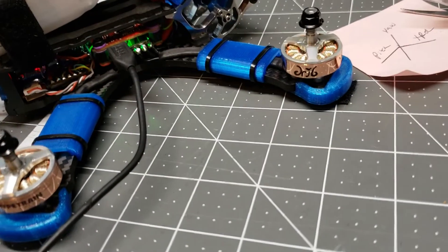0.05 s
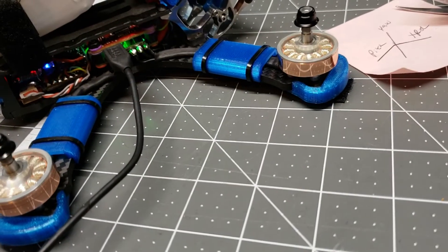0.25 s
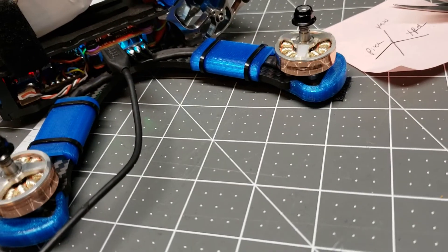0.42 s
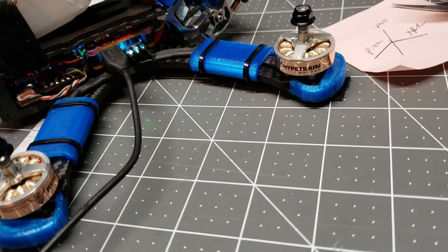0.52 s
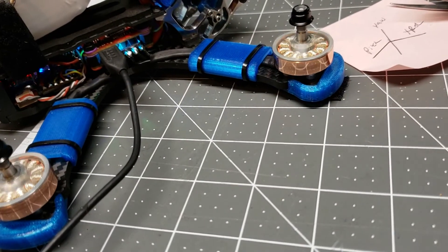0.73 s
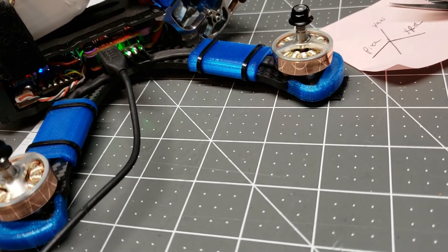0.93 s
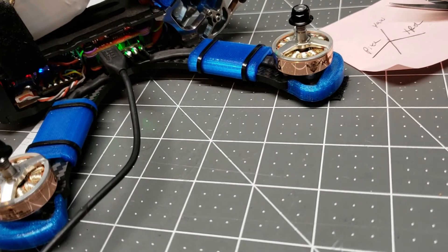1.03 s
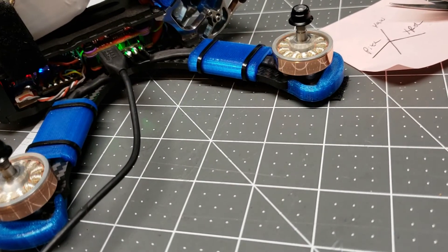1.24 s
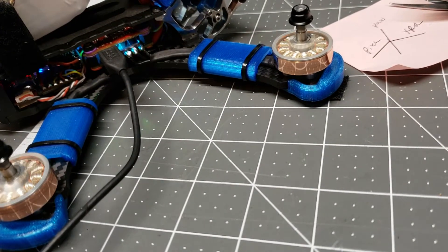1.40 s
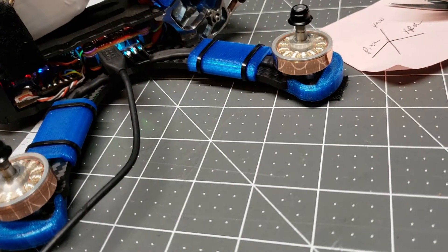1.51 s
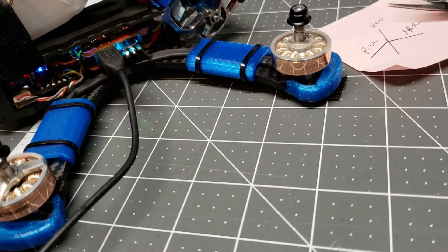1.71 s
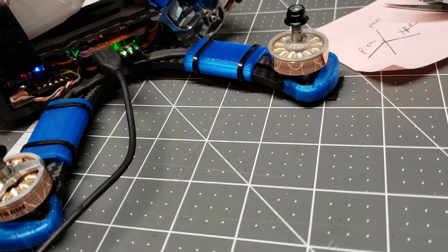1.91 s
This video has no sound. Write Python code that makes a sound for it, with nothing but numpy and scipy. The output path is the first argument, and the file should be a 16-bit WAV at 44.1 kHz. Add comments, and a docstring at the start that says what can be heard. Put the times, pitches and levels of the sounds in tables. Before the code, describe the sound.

Drone motors twitch three times with harsh metallic buzzing zips, then coast down with a faint whine.

```python
"""On a workbench in a hard room, small brushless drone motors twitch, spin up and brake three times near a phone.
Rough kicks of the drive current ring the metal bells, magnets whine on multiples of the shaft speed,
and the frame and an arm shake. After the last burst the rotors coast down, singing faintly.
A hiss swells before the first burst, the room rings on after each sound, and a low hum lies under it all."""
import sys
import numpy as np
from scipy import signal
from scipy.fft import rfft, irfft
from scipy.io import wavfile
from scipy.ndimage import uniform_filter1d, map_coordinates

SR = 44100
rng = np.random.default_rng(int(sys.argv[2]) if len(sys.argv) > 2 else 0)


def field_ratio(decibels):
    """Amplitude ratio for a level in dB (20 dB per decade); scalars and array-likes work."""
    return 10 ** (np.asarray(decibels, dtype=float) / 20)


def to_wav(s):
    """Save 16-bit WAV."""
    ch = np.atleast_2d(s).T  # columns
    pcm = np.round(np.clip(ch, -1, 1) * 32767)  # PCM
    wavfile.write(sys.argv[1], SR, pcm.astype(np.int16))


N = 85995  # length in samples


def unit(x):
    """Scale to rms 1."""
    return x / np.sqrt(np.mean(x ** 2, axis=-1, keepdims=True))


def on_log(hz, table):
    """Read a (f/Hz, value) table on a logarithmic frequency axis."""
    points = np.array(table, float)
    return np.interp(np.log(np.maximum(hz, 1)), np.log(points[:, 0]), points[:, 1])


def colour(x, table):
    """Make each frequency louder or softer, following a (f/Hz, level/dB) table."""
    gain = field_ratio(on_log(np.fft.rfftfreq(N, 1 / SR), table))
    return irfft(rfft(x) * gain, N)


def ring(x, hz, width):
    """Two-pole resonance 'width' Hz wide, with gain 1 at its centre."""
    return signal.lfilter(*signal.iirpeak(hz, hz / width, fs=SR), x)


def walk(rate):
    """Wandering random curve: 'rate' new values a second, each held and then smoothed twice."""
    hold = int(SR / rate)
    steps = np.repeat(rng.standard_normal(N // hold + 1), hold)
    return 1.22 * uniform_filter1d(uniform_filter1d(steps, hold), hold)[:N]


def read(tables, col, off):
    """One column of several tables drawn along time, with the value 'off' outside them."""
    t = np.arange(N) / SR
    out = np.full(N, float(off))
    for rows in tables:
        points = np.array(rows, float)
        on = (t >= points[0, 0]) & (t <= points[-1, 0])
        out[on] = np.interp(t[on], points[:, 0], points[:, col])
    return out


def later(x, seconds):
    """Delay, also by fractions of a sample."""
    return map_coordinates(x, [np.arange(N) - seconds * SR], order=3, mode="nearest")


def whine(shaft, orders, flutter_db):
    """Sines on multiples of the shaft speed, each wavering in pitch and level."""
    total = 0
    for multiple, db in orders:
        speed = shaft * (1 + .002 * walk(90))
        turns = np.cumsum(speed) / SR
        sine = np.sqrt(2) * np.sin(2 * np.pi * (multiple * turns + rng.random()))
        total = total + field_ratio(db + flutter_db * walk(59.56)) * sine
    return total


# how fast the shaft turns, one list for each burst: (t/s, f/Hz)
SHAFT_SPEED = [
    [(.22, 20), (.265, 40), (.285, 75), (.3, 90), (.32, 102), (.345, 112), (.36, 86), (.37, 72), (.4, 40)],
    [(.77, 22), (.82, 48), (.84, 75), (.855, 87), (.865, 95), (.876, 84), (.885, 74), (.915, 55)],
    [(1.25, 20), (1.3, 45), (1.33, 97), (1.35, 108), (1.38, 116.6), (1.42, 120.6), (1.46, 122.4),
     (1.5, 122.7), (1.567, 122.9), (1.59, 84), (1.605, 85), (1.63, 72)],
]


def shaft_speed():
    """The shaft spins up and is braked in each burst; 20 Hz stands in between bursts."""
    return read(SHAFT_SPEED, col=1, off=20)


# how hard the drive works, one list for each burst: (t/s, rasp level/dB, frame shake level/dB against the rasp,
# whine level/dB before motor() takes off 10, left over right level/dB)
EFFORT = [
    [(0.227, -21.5, -24.5, -2, 2.5), (0.241, -20.5, -22.5, 2, -4), (0.259, -39, -19, -1.5, 11.5),
     (0.273, -17.5, -24.5, -1, -3.0), (0.301, -17.5, -27, 0, 0), (0.333, -20, -31.5, -5, -1.5),
     (0.365, -19, -14.5, 0, -1), (0.4, -24, -20.5, -2, -2.5)],
    [(0.778, -40.5, -21, -7, -1.5), (0.792, -27, -27.5, -1, -3.5), (0.808, -45.5, -12.5, -1, -7),
     (0.822, -21, -37, 0, -1.5), (0.846, -17.5, -22, 2, 0), (0.862, -28, -11.5, 1, -4.0),
     (0.878, -18, -23.5, 0.5, -2), (0.915, -41.5, -10.5, 3, 8.5)],
    [(1.258, -54, -7.5, -1, 0.5), (1.268, -28.5, -23.5, -5, -6), (1.29, -46, -20.5, -1, 5),
     (1.304, -19.5, -29.5, 0.5, 2), (1.33, -23.5, -23.5, 7, -3), (1.338, -28, -12.5, 1, 3),
     (1.364, -30, -36, -7.5, 0.5), (1.472, -27, -36, -15, -1.5), (1.544, -28, -39.5, -6, 3.5),
     (1.592, -18, -18.5, 5.5, -2.5), (1.63, -64, -16.5, 2.5, -2.5)],
]
# colour of the motor's rasp and whine: (f/Hz, level/dB)
MOTOR_COLOUR = [(470, -48), (800, -34.5), (1200, -25), (2150, -14), (2700, -14), (4000, -2), (5500, -4),
                (7500, -3), (9300, -8.5), (12000, -12), (16000, -7.5)]


def motor(shaft):
    """Kicks, switching noise and whine take on the motor's colour and ring the bells; the frame shakes."""
    effort_db = read(EFFORT, col=1, off=-140)
    switching_noise = field_ratio(-3) * rng.standard_normal(N)
    rasp = unit(kicks(shaft)) + switching_noise
    scale = 1 / np.std(colour(rasp, MOTOR_COLOUR))  # brings the coloured rasp to rms 1
    rasp = rasp * field_ratio(.6 * walk(250))  # a slight flutter
    whine_db = read(EFFORT, col=3, off=-54.5) - 10
    tone = field_ratio(whine_db) * cogging(shaft) + fast_lines(shaft)
    drive = colour(rasp + tone, MOTOR_COLOUR) * scale * field_ratio(effort_db)
    return drive + bells(drive, effort_db), frame(effort_db)


def kicks(shaft):
    """Each switching of the coils kicks the rotor, with random sign and size."""
    per_turn, jitter = 42, .5  # kicks before jitter (which adds about 13 %), spread of log rate
    rate = shaft * per_turn
    count = np.cumsum(rate * np.exp(jitter * rng.standard_normal(N)) / SR)
    size = rng.standard_normal(N) * field_ratio(3 * rng.standard_normal(N))
    clicks = np.diff(np.floor(count), prepend=0) * size
    return clicks / np.sqrt(rate / SR)  # about equal power at every speed


# magnets passing the teeth: (multiple of the shaft speed, level/dB)
COGGING = [(84, 0)]


def cogging(shaft):
    """Magnets passing the teeth whine; silent below 45 Hz shaft speed, full from 75 Hz."""
    return np.clip((shaft - 45) / 30, 0, 1) * whine(shaft, COGGING, flutter_db=6)


# extra whine lines at full speed: (multiple of the shaft speed, level/dB)
FAST_LINES = [(32, -18), (63.5, -8), (72, -10), (82, -12), (83, -15), (84, -9), (90, -13)]


def fast_lines(shaft):
    """More whine lines fade in as the shaft goes from 108 to 118 Hz."""
    return np.clip((shaft - 108) / 10, 0, 1) * whine(shaft, FAST_LINES, flutter_db=3)


# ringing of the motor bells: (f/Hz, width/Hz, level/dB)
BELLS = [(4416, 120, -1.5), (5140, 67, -4.5), (6285, 576, 2.5), (7102, 290, 9), (7538, 297, 6.5),
         (9040, 1100, 3)]


def bells(drive, effort_db):
    """The metal bells are resonances struck by the drive, ringing out more at high effort."""
    load_db = .9 * (np.maximum(effort_db, -40) + 23.5)  # .9 dB more for each dB of effort
    loaded = drive * field_ratio(load_db)
    total = 0
    for k, (hz, width, db) in enumerate(BELLS):
        total = total + (-1) ** k * field_ratio(db) * ring(loaded, hz, width)
    return total


# colour of the shaking frame: (f/Hz, level/dB)
FRAME = [(18, -34.5), (30, -12.5), (92, 2), (284, -4), (468, 6), (539, -8.5), (631, -3), (737, -14.5),
         (826, -6), (900, -17), (1170, -43), (1980, -120)]


def frame(effort_db):
    """The frame shakes: a low noise, uneven in level, that follows the effort."""
    noise = rng.standard_normal(N) * field_ratio(3.25 * walk(60.69))
    return unit(colour(noise, FRAME)) * field_ratio(effort_db + read(EFFORT, col=2, off=-30))


# low whine, one list for each burst: (t/s, level/dB before scene() sets its share)
LOW = [
    [(.28, -75), (.305, -51), (.335, -38.5), (.35, -51.5), (.36, -81)],
    [(.83, -77), (.855, -57), (.87, -57.5), (.88, -78)],
    [(1.31, -66), (1.34, -58.5), (1.38, -48), (1.42, -42.5), (1.48, -51), (1.5, -54.5), (1.56, -46),
     (1.575, -54), (1.59, -86.5)],
]
# lines of the low whine: (multiple of the shaft speed, level/dB)
LOW_LINES = [(6, 0), (12, -20), (18, -4)]


def arm(shaft):
    """Low multiples of the shaft speed shake the arm, whose own resonance rings on."""
    arm_hz, arm_t60 = 732, .55  # Hz; seconds to die by 60 dB
    low = field_ratio(read(LOW, col=1, off=-140)) * whine(shaft, LOW_LINES, flutter_db=3.5)
    return low + ring(low, arm_hz, np.log(1000) / np.pi / arm_t60)


# one list for each coasting rotor: (t/s, shaft f/Hz, level/dB)
COAST = [
    [(1.72, 66, -88), (1.76, 60.5, -68), (1.8, 53.7, -58), (1.84, 46.7, -64), (1.92, 34.8, -63),
     (1.96, 30, -66)],
    [(1.7, 76, -72), (1.735, 74, -54), (1.755, 70, -76), (1.8, 58.5, -78), (1.84, 52, -75), (1.88, 46, -75),
     (1.92, 41.4, -69), (1.96, 37, -74)],
]
# lines of the coasting whine: (multiple of the shaft speed, level/dB)
COAST_LINES = [(66, -25), (84, -3), (168, -28)]
# multiple 14 of the first rotor sounds briefly: (t/s, level/dB)
COAST_LOW = [(1.7, -88), (1.73, -72), (1.77, -74), (1.8, -90)]


def coasting():
    """Unpowered rotors slow down and sing as the magnets pass the teeth."""
    first = read([COAST[0]], col=1, off=18)
    total = field_ratio(read([COAST_LOW], col=1, off=-140)) * whine(first, [(14, 0)], flutter_db=3)
    for rotor in COAST:
        shaft = read([rotor], col=1, off=18)
        level = field_ratio(read([rotor], col=2, off=-140))
        total = total + level * whine(shaft, COAST_LINES, flutter_db=5)
    return total


# decay time of the room: (f/Hz, time to die by 60 dB/s)
ROOM_T60 = [(100, 0.2), (700, 0.43), (2000, 0.28), (4000, 0.31), (7000, 0.41), (10000, 0.18), (15000, 0.19)]
# colour of the room: (f/Hz, level/dB)
ROOM_COLOUR = [(100, -1.5), (700, 6.5), (1100, -17.5), (2500, 5.5), (4500, -3.5), (7000, 2.5), (10000, -4),
               (15000, 15)]


def room(x):
    """Dense reflections, each band dying at its own rate, different left and right."""
    t = np.arange(SR) / SR
    tail = 0
    for hz in 70 * 2 ** np.arange(0, 8, .5):
        band = signal.lfilter(*signal.iirpeak(hz, 2.5, fs=SR), rng.standard_normal((2, SR)))
        fall_db = 60 * t / on_log(hz, ROOM_T60)
        fall = field_ratio(-fall_db) + field_ratio(-24.5 - fall_db / .97)  # a weak second tail dies a little faster
        tail = tail + band * field_ratio(on_log(hz, ROOM_COLOUR)) * fall
    tail = tail * (1 - np.exp(-t / .004))  # reflections build up over some 4 ms
    tail = tail / np.sqrt(np.sum(tail ** 2) / 2)
    return signal.fftconvolve(x[None], tail, axes=1)[:, :N]


def stereo_noise(table, likeness):
    """Coloured noise at rms 1; likeness 0 = left and right unrelated, 1 = identical."""
    middle, side = rng.standard_normal((2, N))
    sides = np.sqrt(1 - likeness) * side * np.array([[1], [-1]])
    return unit(colour(np.sqrt(1 + likeness) * middle + sides, table))


# swell of the hiss before the first burst: (t/s, level/dB)
HISS = [(0.0, -79), (0.124, -52.5), (0.218, -46), (0.226, -41.5)]
# colour of the hiss: (f/Hz, level/dB)
HISS_COLOUR = [(240, 0), (400, -2.5), (1160, -14), (1510, -8), (2930, -9), (3640, -6.5), (3930, -9),
               (7400, -2), (8760, -14.5), (16000, -9.5)]


def hiss():
    """Coloured noise swells, then stops as the first burst begins."""
    return stereo_noise(HISS_COLOUR, .21) * field_ratio(read([HISS], col=1, off=-140))


# colour of the hum: (f/Hz, level/dB)
HUM_COLOUR = [(12, -36), (20, -55), (48, -6), (124, -4), (281, -11), (573, -33), (908, -51), (1010, -40),
              (1440, -44), (1740, -55), (3000, -53), (3900, -83), (6600, -120)]


def hum():
    """Low noise wandering in level, 3 dB stronger on the right."""
    sides_db = np.array([[-1.5], [1.5]])
    return stereo_noise(HUM_COLOUR, 1.0) * field_ratio(-67.5 + 3.4 * walk(38) + sides_db)


def scene():
    """Two motors, the arm and the coasting rotors up close; the room, the hiss and the hum around them."""
    lag, low_lag, likeness = .0001, .00054, .66  # s; s; share of the first motor on the right
    shaft = shaft_speed()
    first, shake = motor(shaft)
    second, second_shake = motor(shaft)
    low = arm(shaft)
    pan_db = read(EFFORT, col=4, off=-1.3)
    right = likeness * later(first, lag) + np.sqrt(1 - likeness ** 2) * second
    near = np.array([first, right]) * field_ratio(np.array([pan_db, -pan_db]) / 2)
    near = near + np.array([field_ratio(-5) * shake, shake + second_shake])
    near = near + field_ratio(9.5) * np.array([later(low, low_lag), low])  # the low whine comes later on the left
    near = near + coasting() * field_ratio(np.array([[-1.5], [1.5]]))
    return near + field_ratio(-11.5) * room(first + shake + low) + hiss() + hum()


def band_limit(x):
    """A steep low-pass at the top of the band."""
    return signal.sosfilt(signal.butter(12, 17010, fs=SR, output="sos"), x)


def record(dry):
    """The phone cuts the treble steeply above 15800 Hz."""
    low_pass = signal.ellip(8, .2, 70, 15800, fs=SR, output="sos")
    mix = signal.sosfilt(low_pass, dry)
    return band_limit(mix)


dry = scene()
out = record(dry)
to_wav(out)
```